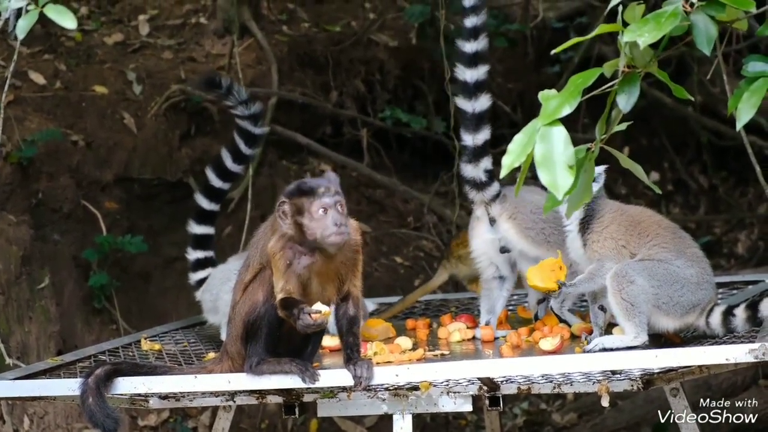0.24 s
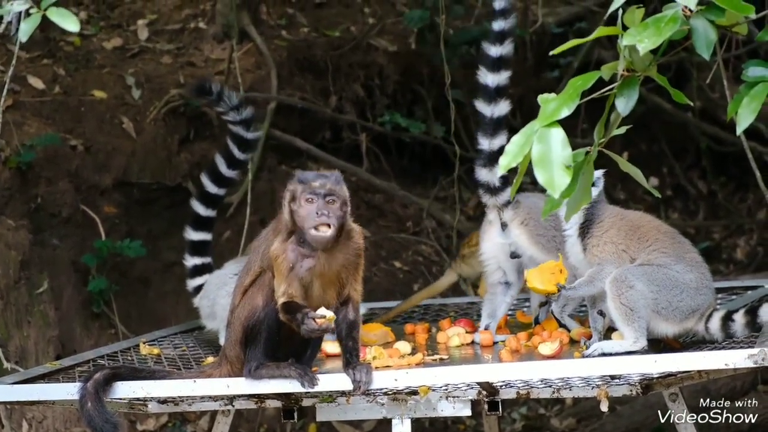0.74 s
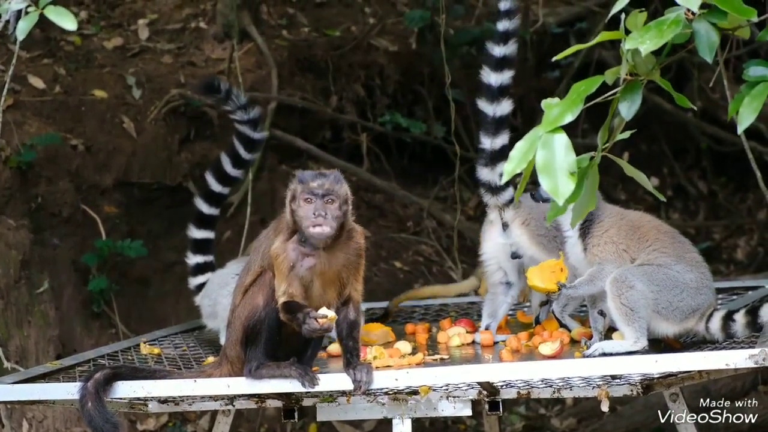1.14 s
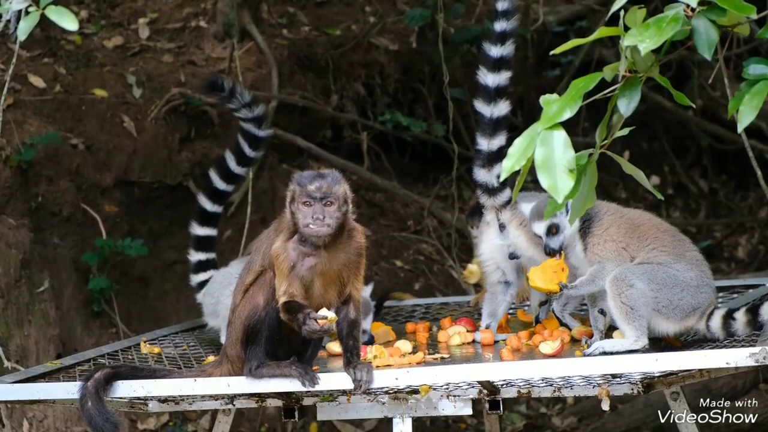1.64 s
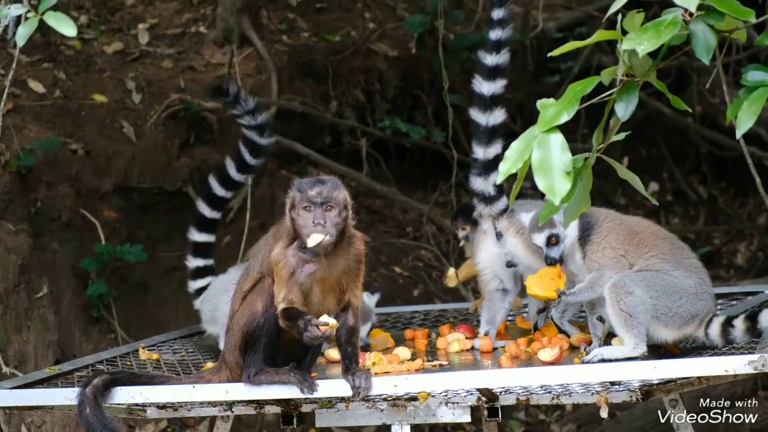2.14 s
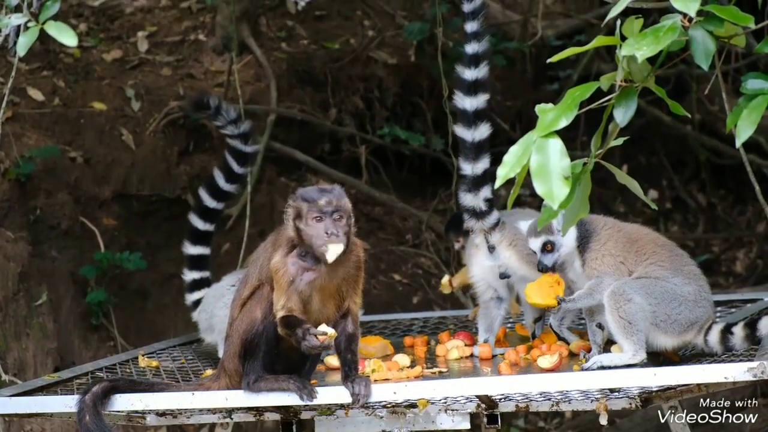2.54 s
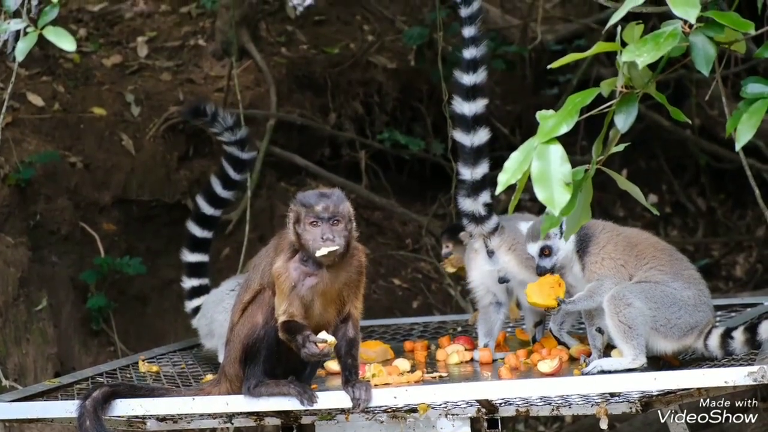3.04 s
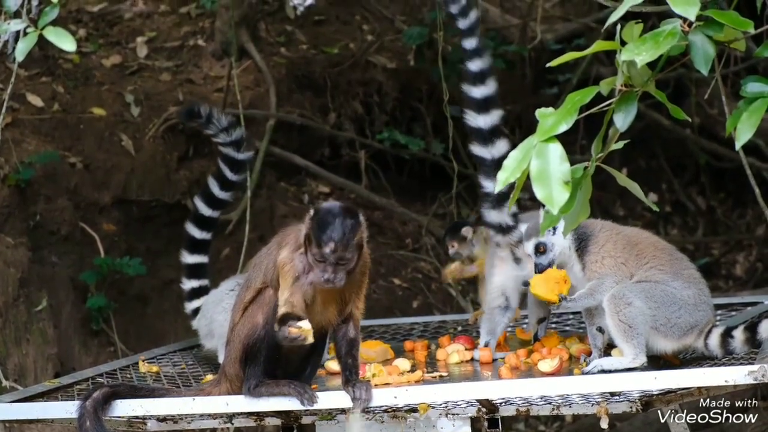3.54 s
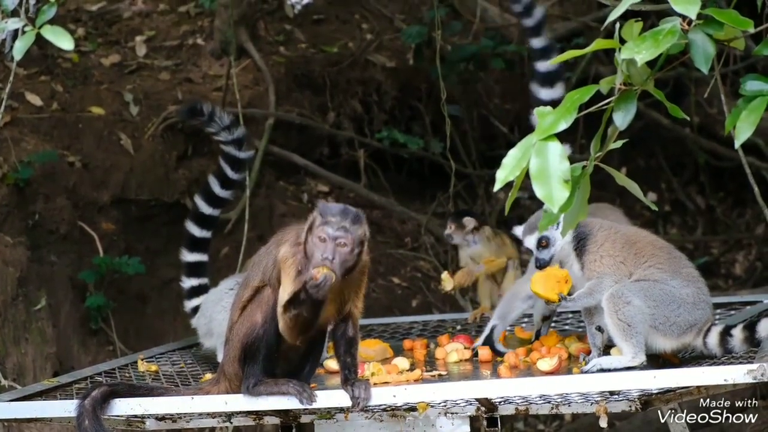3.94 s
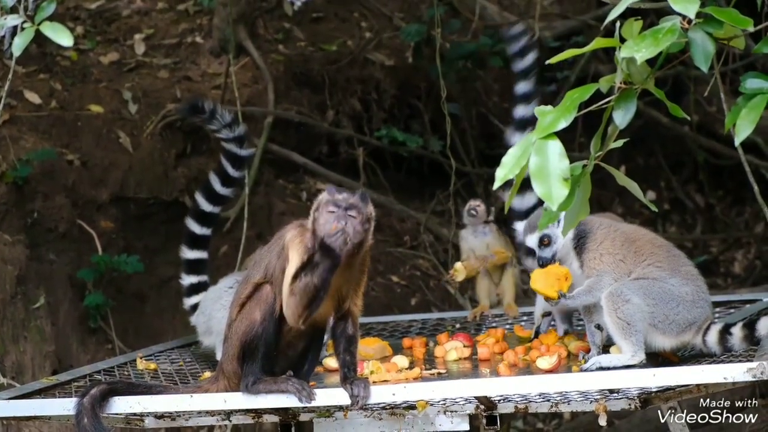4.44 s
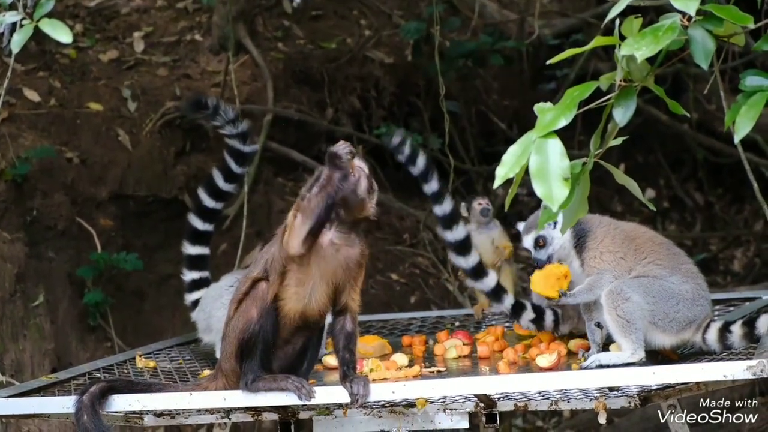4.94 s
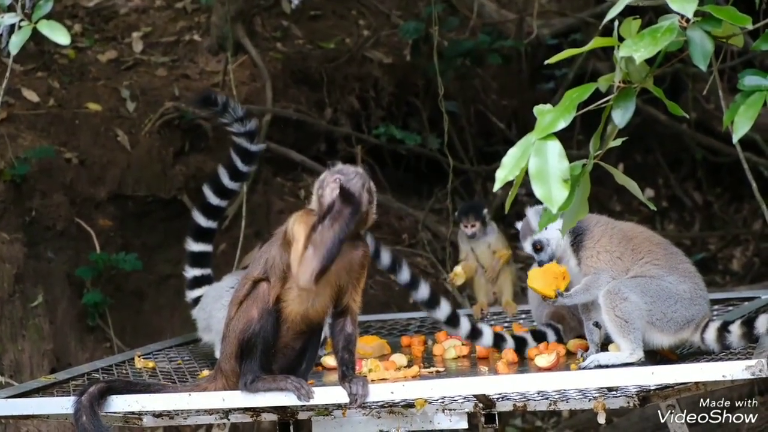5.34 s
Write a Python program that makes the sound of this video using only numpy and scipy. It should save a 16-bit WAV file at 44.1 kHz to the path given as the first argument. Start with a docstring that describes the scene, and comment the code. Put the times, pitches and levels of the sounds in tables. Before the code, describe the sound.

Outdoors at a fruit platform, a low engine drone with clatter and rumble swells up. A breathy whimper leads into a rising growl, then come three spaced yaps, a short hiss and a hoarse bark. The engine drops quieter and slows; a thud, scrapes and metallic taps on wire mesh follow. Voices are close and slightly right, with a short natural echo; thin grainy high noise flickers on the left.

```python
"""An engine hums and clatters first, with a rumble and a fading whine; later it slows down.
Over it monkeys and lemurs squabble for fruit on an outdoor feeding platform: one animal growls, yaps three
times, hisses and gives a hoarse bark; thin, grainy high noise bands sound on the left; feet scuffle on wire mesh.
The engine sums multiples of its firing rate, ringing panels and noise; voices are vocal-fold pulses and breath
through resonances; hisses and high bands are gliding noise; contacts excite mesh, wires and platform."""
import sys
import numpy as np
from scipy import signal
from scipy.fft import rfft, irfft, next_fast_len
from scipy.io import wavfile
from scipy.ndimage import uniform_filter1d, minimum_filter1d

SR = 44100
rng = np.random.default_rng(int(sys.argv[2]) if len(sys.argv) > 2 else 0)


def int16_out(signal):
    """Quantize to a 16-bit WAV file."""
    q = np.round(np.clip(np.atleast_2d(signal).T, -1, 1) * 32767)
    wavfile.write(sys.argv[1], SR, q.astype(np.int16))


N = 245637
TIME = np.arange(N) / SR

# Engine speed: (time [s], firing rate [1/s])
FIRING_RATE = [(0, 26.85), (0.6, 27.28), (1.2, 27.6), (1.8, 27.68), (2.4, 27.44), (3, 27.1), (3.3, 26.79),
               (3.55, 24.61), (3.9, 23.66), (4.5, 23.3), (4.9, 22.6), (5.25, 21.55), (5.57, 20.41)]
# Exhaust drone, before its trim: (time [s], level [dB])
DRONE_LEVEL = [(0.0, -58), (0.04, -37.5), (0.51, -24.5), (2.02, -24), (2.17, -27.5), (2.2, -36),
               (3.35, -36), (3.38, -42), (3.94, -37), (4.19, -44), (4.92, -18), (5.34, -19.5), (5.45, -27),
               (5.57, -42)]
# Exhaust orders: (multiple of the firing rate [1], level [dB])
EXHAUST_ORDERS = [(5, 10), (6, -2), (7, 3)]
# Response of the exhaust pipe: (frequency [Hz], gain [dB])
PIPE_RESPONSE = [(95, -34.5), (118, -1), (140, 0.5), (166, 4.5), (178, -3), (195, -29)]
# Shaking of the engine block, before surge and trim: (time [s], level [dB])
SHAKE_LEVEL = [(0, -54), (.3, -39), (.7, -34), (1, -31), (1.7, -27.5), (2.08, -33), (2.25, -52.5),
               (3.3, -49), (3.5, -53.5), (4.3, -54.5), (4.9, -48), (5.57, -45.5)]
# Orders of the shaking: (multiple of the firing rate [1], level [dB])
BLOCK_ORDERS = [(2, -15), (3, -7), (4, 0), (6, -2), (8, -10), (9, -11), (10, -10)]
# Casing panels: (frequency [Hz], width [Hz], relative level [dB])
CASING_PANELS = [(225.2, 39, 1), (248.1, 12, 2.5), (284, 18, 0), (385.6, 22, -9), (464, 21, -8),
                 (575, 29, -6), (776.4, 44, -13)]
# Whirr of the moving parts: (multiple of the firing rate [1], level re drone [dB])
WHIRR_ORDERS = [(12, -23.5), (14, -25), (17, -18.5), (21, -20.5), (35, -26)]
# A panel through which the whirr passes: (frequency [Hz], gain [dB])
WHIRR_PANEL = [(285, -7), (302, 18.5), (320, 0.5)]
# Clatter and outdoor air, before the trim; also drives the casing: (time [s], level [dB])
AIR_LEVEL = [(0.0, -39.5), (0.17, -30.5), (0.46, -31.5), (0.62, -25.5), (1.09, -28.5), (1.63, -28),
             (2.37, -29.5), (2.54, -40.5), (3.09, -38.5), (3.37, -37.5), (3.54, -43.5), (4.0, -47.5),
             (4.34, -38), (4.82, -27), (5.48, -28.5), (5.57, -49)]
# Spectrum of clatter and outdoor air: (frequency [Hz], relative level [dB])
AIR_SPECTRUM = [(160, -17.5), (280, -2), (303, -10), (461, -6.5), (516, -8.5), (565, -9.5), (662, -9),
                (1880, -12.5), (2700, -29.5), (3750, -20.5), (4200, -41), (5460, -79), (9240, -120)]
# Low rumble: (time [s], level [dB])
RUMBLE_LEVEL = [(0.0, -45), (0.25, -32.5), (.6, -28.5), (0.98, -28.5), (2.08, -32.5), (2.23, -45.5),
                (3.29, -40.5), (3.46, -48), (4.2, -48.5), (4.6, -31), (5.0, -32.5), (5.41, -32),
                (5.57, -23)]
# Spectrum of the rumble: (frequency [Hz], relative level [dB])
RUMBLE_SPECTRUM = [(15, -20), (30, -9), (55, -8), (85, 3), (130, 5), (190, 3), (300, -20), (600, -80)]
# Correlation of the two channels in diffuse noise: (frequency [Hz], correlation [-1 to 1])
CHANNEL_CORRELATION = [(100, 1), (400, 0.82), (850, 0.7), (1500, -0.5), (2500, 0.047)]
# A faint whine that fades away: (time [s], level [dB])
WHINE_LEVEL = [(0, -42), (.25, -45), (.45, -41), (.9, -39.5), (1.15, -46), (2.1, -54), (2.4, -80.5)]
# Its partials: (harmonic number [1], level at time 0 [dB], fade [dB/s])
WHINE_HARMONICS = [(1, -3.5, -1.5), (2, 3.5, 0), (4, -1, 11.5)]
# Steps and scrapes on the mesh: (peak time [s], length scale [s], level [dB], ring of the wire [Hz])
MESH_SCUFFS = [(2.108, 0.035, -21.5, 1700), (2.129, 0.0097, -39, 2550), (4.725, 0.034, -24, 1350),
               (4.74, 0.045, -30, 2700), (4.756, 0.042, -28, 1580), (4.836, .012, -30, 1210),
               (4.893, 0.032, -25.5, 1490), (5.178, 0.046, -32, 2420), (5.209, 0.027, -38.5, 2250),
               (5.235, 0.028, -28.5, 2210), (5.297, 0.037, -23.5, 1590), (5.317, 0.029, -29.5, 2830),
               (5.385, 0.043, -28.5, 1490), (5.519, 0.029, -18.5, 1650), (5.524, 0.016, -19, 600),
               (5.545, 0.042, -20, 2100)]
# Spectrum of the grit under the feet: (frequency [Hz], relative level [dB])
GRIT_SPECTRUM = [(150, -50), (300, 1.5), (570, 5), (1000, -2), (1500, -1.5), (2400, -9), (3200, -16.5),
                 (4500, -8.5), (5200, -65), (7000, -77)]
# Landings on the platform: (time [s], level [dB])
LANDING_HITS = [(4.767, -13), (4.78, -9.5), (5.521, -41)]
# Modes of the platform: (frequency [Hz], relative level [dB], time to fall 60 dB [s])
PLATFORM_MODES = [(199, 5.5, 0.16), (204, -25, .1), (556, -29, 0.041)]
# Claws and scraps of food knock on the mesh: (time [s], level [dB], ring of the wire [Hz])
MESH_TAPS = [(4.711, -15, 1350), (4.785, -26.5, 1110), (4.878, -26, 1620), (4.892, -25.5, 1457),
             (5.063, -24, 1410), (5.171, -27, 2310), (5.289, -18, 1400), (5.362, -18.5, 1625),
             (5.437, -28, 1290), (5.506, -18, 1670), (5.536, -11.5, 1630)]
# Modes of a wire: (multiple of its ring [1], width [Hz], relative level [dB])
WIRE_MODES = [(1, 93, 4), (1.45, 530, -8.5), (.6, 180, -5.5)]
# Thin, grainy high noise bands: (peak time [s], length [s], centre at the peak [Hz], level [dB], glide [Hz/s])
HIGH_BANDS = [(0.654, 0.054, 5090, -43, -3000), (0.69, 0.096, 3900, -34.5, 4),
              (0.757, 0.027, 13500, -44.5, -12), (1.681, 0.055, 14300, -44, -14000),
              (1.762, 0.15, 13500, -47.5, -14000), (1.83, 0.13, 13600, -51, 14009),
              (1.911, 0.055, 14450, -36.5, 5997.5), (2.059, 0.026, 10700, -54, 0),
              (2.104, 0.048, 13840, -27.5, -30000), (2.104, 0.03, 10540, -34, 2),
              (2.105, 0.029, 5030, -32.5, 7), (2.119, 0.043, 4650, -44, 3), (2.13, 0.025, 12400, -42, 0),
              (3.031, 0.068, 12960, -50, 0), (3.185, 0.075, 14100, -44, 0), (3.284, 0.12, 13800, -36, -3),
              (3.285, 0.12, 11440, -43, -15000), (3.536, 0.046, 13700, -55, -1),
              (4.258, .07, 13800, -58, 0), (4.698, .025, 14000, -42, -4), (5.08, 0.078, 13500, -39, -12000),
              (5.119, 0.1, 14200, -30, -4000), (5.168, 0.15, 13200, -38, -10000),
              (5.244, 0.1, 11430, -36.5, -4), (5.272, 0.061, 12300, -34.5, 0),
              (5.269, 0.058, 14300, -33.5, 1), (5.404, 0.028, 12430, -42, 6), (5.512, 0.052, 12200, -29, 6),
              (5.513, 0.058, 13900, -30, 25000)]
# A falling whimper, breathy yips, a short tick on the mesh, hisses and a faint moan: (peak time [s], length
# [s], centre at # the peak [Hz], width [Hz], level [dB], glide [Hz/s])
NEAR_NOISE_BANDS = [(.3, 0.2, 1277, 380, -29.5, -1900), (3.125, 0.054, 1576, 180, -41, 1),
                    (3.188, 0.038, 1590, 600, -34.5, 2.5), (3.277, 0.049, 1593, 260, -26.5, 1),
                    (3.275, 0.051, 2367, 500, -25.5, -1), (3.28, 0.1, 3400, 706, -43, -2),
                    (4.08, 0.066, 1343, 400, -44.5, 0), (4.14, 0.056, 1455, 400, -43.5, 0),
                    (4.74, 0.27, 822, 188, -30.5, -2)]
# Throat resonances: (frequency [Hz], width [Hz], relative level [dB]);
# the first row is the chest, the second the main resonance, the rest the mouth
GROWL_RESONANCES = [(298, 180, 0), (759, 103, 0), (1692, 160, 7), (2410, 500, -8)]
YAP_RESONANCES = [(335, 320, 0), (822, 232, 0), (1660, 240, -2), (2160, 330, -7), (3014, 220, -2.5)]
BARK_RESONANCES = [(535, 120, 0), (915, 206, 0), (1350, 520, 14), (1900, 340, -1), (2200, 380, -2)]
# Growl in surges, before envelope and mouth trim:
# (time [s], level [dB], chest re level [dB], mouth re level [dB])
GROWL_SURGES = [(0.42, -29.5, -1, -9), (0.574, -27, 0.5, -14), (0.583, -18, -7, -16), (0.602, -23, -2, -16),
                (0.62, -18.5, -2, -19), (0.636, -25, 6, -14), (0.648, -16, -3, -1), (0.662, -19, 0, -3),
                (0.676, -13, -4, -10), (0.686, -18, 4, 1), (0.696, -12, -1, -1), (0.704, -18, 0, -8)]
# Pitch of the bark, which sags and then flips up: (time [s], pitch [Hz])
BARK_PITCH = [(3.34, 455), (3.36, 445), (3.383, 420), (3.405, 470), (3.42, 485), (3.428, 535)]
# Effort of the bark, before the rattle: (time [s], level [dB], mouth re level [dB], chest re level [dB])
BARK_STRENGTH = [(3.333, -41.5, 5, -23.5), (3.349, -23.5, 0, -23), (3.361, -20.5, -1, -24),
                 (3.369, -14.5, 0, -35), (3.416, -12.5, -2.5, -35.5), (3.426, -36, 17.5, -2),
                 (3.438, -39, 16.5, 8), (3.448, -38.5, 9.5, 5), (3.47, -40.5, 6, 6)]
# Yaps: (time of highest pitch [s], highest pitch [Hz], rise [s], fall [s], extra chest on top [dB],
# added roughness on the rise [0-1], added roughness on the fall [0-1])
YAP_ARCHES = [(2.242, 549, .066, .068, 2, .07, .07), (2.459, 452, .042, .046, 8, .12, .26),
              (2.821, 506, .051, .051, 18, .09, .06)]
# Effort, one list for each yap: (time [s], level [dB], mouth re level [dB])
YAP_STRENGTHS = [
    [(2.165, -43.5, -4), (2.175, -15.5, -4), (2.19, -13.5, -1.5), (2.202, -7.5, -11.5), (2.222, -15, 6.5),
     (2.244, -23.5, 10), (2.274, -3.5, -12), (2.303, -23, -14.5), (2.325, -34.5, -21)],
    [(2.412, -49, 5.5), (2.426, -21, -0.5), (2.442, -8.5, -3.5), (2.456, -8, -7.5), (2.466, -17, -11),
     (2.492, -14.5, -6.5), (2.515, -25, -15.5), (2.55, -36, -19)],
    [(2.75, -40.5, -7.5), (2.77, -28, -1), (2.783, -12, -2.5), (2.794, -15, 0), (2.802, -17, 0.5),
     (2.821, -25, 4.5), (2.836, -18.5, 2.5), (2.862, -21.5, -18.5), (2.88, -37, -26)],
]
# Chest in a yap, before the extra on top: (pitch [Hz], chest re level [dB])
YAP_CHEST_BY_PITCH = [(270, 1), (370, -10), (430, -19), (550, -10)]
# The voice clears as it rises: (pitch [Hz], roughness before the added part [0-1])
YAP_ROUGHNESS_BY_PITCH = [(290, .6), (370, .38), (420, .16), (480, .04)]

UNEVEN_FIRING = .08  # relative spread of the firing strength
WOBBLE_DB, WOBBLE_HZ = .6, 3.0  # spread and speed of the wobble of each engine order
SURGE_HZ, SURGE_DB, SURGE_PEAK_S = 4.3, 4, 1.3  # the shaking swells and sinks regularly
SECOND_HUM_HZ, SECOND_HUM_DB = 86.6, -2.5  # a steady pitch beside the block; level re the shaking
LABOUR_DB = 1.5  # gain of the casing for each firing per s below the highest speed
AIR_BRIGHT_DB, AIR_TOP_HZ = -27, 3200  # fully bright from this air level up; top of the clatter
WHINE_HZ, WHINE_WAVER = 489.6, .024  # mean pitch and its relative spread
SCUFF_RISE, SCUFF_FALL = 0.38, 0.33  # time constants as shares of a scuff's length scale
GRAINS_HZ, GRAIN_DB = 110, 4.8  # speed and depth of the crackle of the grit
TAP_DECAY_S = .005  # decay time constant of the chatter of contact
HIGH_BAND_WIDTH, HIGH_BAND_GRAIN_DB = 0.035, 4.0  # width as a share of the centre; depth of the grains
BAND_GRAINS_HZ = 70
GROWL_HZ, GROWL_ROUGH = (218, 394.3), (0.93, 0.27)  # each without strain and at full strain
GROWL_MOUTH_DB = -4
GROWL_START_S, GROWL_CLIMAX_S, GROWL_SWELL_S = .36, .699, .11
GROWL_ATTACK_S, GROWL_RELEASE_S = 0.082, 0.008
BARK_ROUGH = .45
BARK_PULSES_PER_S, BARK_PULSE_DB, BARK_PULSE_PEAK_S = 68, 2.0, 3.371  # rate, depth, time of one crest
YAP_FOOT_HZ, YAP_TOP_S = 266, 0.072  # pitch at both ends of the arch; length of its top
CUTOFF_HZ = 15100


def from_db(db):
    """Logarithmic level: decibels become an amplitude gain."""
    return 10 ** (np.asarray(db) / 20)


def rms_one(x):
    """Normalisation: scale the mean power to 1."""
    return x / np.sqrt(np.mean(x ** 2) + 1e-20)


def in_time(rows, t=TIME):
    """Linear interpolation: the columns of a curve at the times t."""
    s, *columns = np.transpose(rows)
    return [np.interp(t, s, c) for c in columns]


def at_hz(points, hz):
    """Logarithmic frequency scale: read a spectrum between its points."""
    f, value = np.transpose(points)
    return np.interp(np.log(hz + 1), np.log(f), value)


def cut(x, hz, kind, order=4):
    """Butterworth filtering: a low- or high-pass with a flat pass band."""
    return signal.sosfilt(signal.butter(order, hz, kind, fs=SR, output="sos"), x)


def wander(hz, size):
    """Low-pass random process: slow chance up to about hz, drawn from a longer curve of spread 1."""
    step, count = 16, 16384  # samples between points; number of points
    f = np.arange(count // 2 + 1) * SR / (step * count)
    spectrum = rfft(rng.standard_normal(count)) * np.exp(-.5 * (f / hz) ** 2)
    slow = rms_one(irfft(spectrum))
    return np.interp(np.arange(size) / step, np.arange(count), slow)


def grains(hz, depth_db):
    """Random amplitude modulation: a gain that breaks noise into grains."""
    return from_db(depth_db * np.clip(wander(hz, N), -2, 2))


def resonate(x, hz, width):
    """Resonance: a damped two-pole oscillator with gain near 1 at its peak."""
    r = np.exp(-np.pi * width / SR)
    numerator = np.array([1, 0, -1]) * (1 - r * r) / 2
    denominator = [1, -2 * r * np.cos(2 * np.pi * hz / SR), r * r]
    return signal.lfilter(numerator, denominator, x + 1e-18)


def body(x, modes):
    """Modal superposition: parallel resonances, each applied twice for dark valleys."""
    return sum(from_db(db) * resonate(resonate(x, hz, width), hz, width) for hz, width, db in modes)


def even(x, seconds):
    """Gain control: hold the running rms at 1."""
    power = uniform_filter1d(x * x, max(int(seconds * SR), 2))
    return x / np.sqrt(np.abs(power) + 1e-14)


def pan(left_db):
    """Interchannel level difference: gains that set left against right."""
    return from_db(np.array([[.5], [-.5]]) * left_db)


def diffuse(colour):
    """Diffuse field: coloured stereo noise whose channel correlation depends on frequency; rms 1."""
    size = 2 * next_fast_len(N // 2 + 1, True)
    f = np.arange(size // 2 + 1) * SR / size
    alike = np.clip(at_hz(CHANNEL_CORRELATION, f), -1, 1)
    mid, side = rfft(rng.standard_normal((2, size))) * from_db(at_hz(colour, f))
    stereo = np.sqrt(1 + alike) * mid + np.sqrt(1 - alike) * side * [[1], [-1]]
    return rms_one(irfft(stereo)[:, :N])


def swell(t, peak_s, length):
    """Half-cosine window: a smooth rise and fall of height 1."""
    return np.cos(np.pi * np.clip((t - peak_s) / length, -.5, .5))


def rumble():
    """Broadband low-frequency radiation: diffuse bass noise under a slow level curve."""
    return from_db(in_time(RUMBLE_LEVEL)[0]) * diffuse(RUMBLE_SPECTRUM)


def engine_order(multiple, db, turns):
    """Harmonic excitation: one slightly wobbling multiple of the firing rate."""
    return from_db(db + WOBBLE_DB * wander(WOBBLE_HZ, N)) * np.sin(2 * np.pi * multiple * turns)


def exhaust(rate, turns, trim_db):
    """Pipe resonance: the pipe weights the exhaust orders as they glide with the engine speed."""
    orders = sum(engine_order(k, db + at_hz(PIPE_RESPONSE, k * rate), turns) for k, db in EXHAUST_ORDERS)
    return from_db(in_time(DRONE_LEVEL)[0] + trim_db) * even(orders, 0.085)


def moving_parts(rate, turns):
    """Forced vibration: high orders whirr and swell when they pass through a panel resonance."""
    orders = sum(engine_order(k, db + at_hz(WHIRR_PANEL, k * rate), turns) for k, db in WHIRR_ORDERS)
    return from_db(in_time(DRONE_LEVEL)[0]) * orders


def block(turns, trim_db):
    """Periodic shaking and beats: surging block orders beside a second low hum of fixed pitch."""
    surge_db = SURGE_DB * np.cos(2 * np.pi * SURGE_HZ * (TIME - SURGE_PEAK_S))
    level = from_db(in_time(SHAKE_LEVEL)[0] + surge_db)
    # odd orders are inverted
    orders = rms_one(sum(engine_order(k, db, turns) * (-1) ** k for k, db in BLOCK_ORDERS))
    second_hum = from_db(SECOND_HUM_DB) * np.sqrt(2) * np.sin(2 * np.pi * SECOND_HUM_HZ * TIME)
    return level * (from_db(trim_db) * orders + second_hum)


def casing(rate, turns, trim_db):
    """Impulse excitation: each uneven firing rings the panels, with added gain as the engine slows."""
    firings = np.diff(np.floor(turns), prepend=0) * (1 + UNEVEN_FIRING * rng.standard_normal(N))
    ringing = rms_one(cut(body(firings, CASING_PANELS), 1600, "low"))
    labour_db = LABOUR_DB * (rate.max() - rate)
    return from_db(in_time(AIR_LEVEL)[0] + labour_db + trim_db) * ringing


def clatter_and_air(turns, trim_db, throb):
    """Amplitude modulation: noise throbs at the firing rate and flickers; it is duller when quieter."""
    level = from_db(in_time(AIR_LEVEL)[0])
    wash = cut(diffuse(AIR_SPECTRUM), AIR_TOP_HZ, "low", order=16)
    brightness = np.clip(level / from_db(AIR_BRIGHT_DB), 0, 1) ** 0.81
    dark = rms_one(cut(wash, 2303, "low", order=12))
    wash = dark + brightness * cut(wash, 2290, "high", order=12)
    throbbing = 1 + throb * np.cos(2 * np.pi * turns)
    flicker = from_db(1.0 * wander(36, N))
    return level * from_db(trim_db) * wash * throbbing * flicker


def engine():
    """Superposition: exhaust, block, casing and moving parts share one firing phase with the clatter."""
    rate, = in_time(FIRING_RATE)
    turns = np.cumsum(rate) / SR  # firings so far
    tones = exhaust(rate, turns, trim_db=0.5) + block(turns, trim_db=2.0)
    tones = tones + casing(rate, turns, trim_db=-9.5) + moving_parts(rate, turns)
    clatter = clatter_and_air(turns, trim_db=-2.5, throb=0.09)
    return (tones + rumble()) * pan(-2.5) + clatter * pan(-4.0)


def whine():
    """Harmonic series with frequency modulation: a faint unsteady tone whose highest partial dies first."""
    db, = in_time(WHINE_LEVEL)
    phase = 2 * np.pi * np.cumsum(WHINE_HZ * (1 + WHINE_WAVER * wander(35, N))) / SR
    tone = sum(from_db(db + part_db - fade * TIME) * np.sin(k * phase) for k, part_db, fade in WHINE_HARMONICS)
    return np.sqrt(2) * tone * pan(-7.5)


def scuffs(ring_db, ring_width_hz):
    """Friction excitation: clumped grains of grit rub the mesh and set its wires ringing."""
    grit = diffuse(GRIT_SPECTRUM) * grains(GRAINS_HZ, GRAIN_DB)
    out = np.zeros((2, N))
    for s, length, db, hz in MESH_SCUFFS:
        span = np.abs(TIME - s) < 2 * length
        age = (TIME[span] - s) / length
        ring = rms_one(resonate(grit[:, span], hz, ring_width_hz))
        rub = rms_one(rms_one(grit[:, span]) + from_db(ring_db) * ring)
        stroke = 2 / (np.exp(-age / SCUFF_RISE) + np.exp(age / SCUFF_FALL))
        out[:, span] += from_db(db) * stroke * rub
    return cut(out, 4250, "low", order=12) * pan(-3.5)


def landings():
    """Free vibration: each landing leaves the platform modes to decay as a thud."""
    out = np.zeros(N)
    for s, db in LANDING_HITS:
        age = np.maximum(TIME - s, 0)
        for hz, mode_db, t60 in PLATFORM_MODES:
            out += from_db(db + mode_db - 60 * age / t60) * np.sin(2 * np.pi * hz * age)
    return cut(cut(out, 430, "low"), 110, "high", order=2) * pan(-3.5)


def taps():
    """Impact excitation: a brief chatter of contact leaves a wire ringing in its modes."""
    out, t = np.zeros(N + SR), TIME[:SR // 10]
    for s, db, hz in MESH_TAPS:
        contact = rng.standard_normal(len(t)) * np.exp(-t / TAP_DECAY_S)
        ring = sum(from_db(mode_db) * resonate(contact, ratio * hz, width) for ratio, width, mode_db in WIRE_MODES)
        start = int(s * SR)
        out[start:start + len(t)] += from_db(db) * ring / np.abs(ring).max()
    return cut(out[:N], 2500, "low", order=8) * pan(-1.0)


def gliding_bands(rows, grain_db=0):
    """Narrow-band noise: two slow noises modulate a gliding carrier, which may break into grains."""
    out = np.zeros(N)
    breaks = grains(BAND_GRAINS_HZ, grain_db)
    for peak_s, length, hz, width, db, glide in rows:
        span = np.abs(TIME - peak_s) < length / 2
        t = TIME[span]
        # the two noises ride on carriers a quarter cycle apart
        a, b = cut(rng.standard_normal((2, N // 8)), width / 2, "low", order=3)[:, -len(t):]
        phase = 2 * np.pi * np.cumsum(hz + glide * (t - peak_s)) / SR
        band = rms_one(breaks[span] * (a * np.cos(phase) + b * np.sin(phase)))
        out[span] += from_db(db) * swell(t, peak_s, length) ** 1.3 * band
    return out


def high_bands():
    """Narrow-band noise: thin, grainy high bands, much stronger on the left."""
    rows = [(s, length, hz, HIGH_BAND_WIDTH * hz, db, glide) for s, length, hz, db, glide in HIGH_BANDS]
    return gliding_bands(rows, HIGH_BAND_GRAIN_DB) * from_db([[0], [-15]])


def call(rows, throat, jitter, breath, flutter_db, flutter_hz):
    """Source and filter: fold pulses, uneven and breathy with roughness, ring in chest, throat and mouth."""
    # rows: (time [s], pitch [Hz], level [dB], chest re level [dB], mouth re level [dB], roughness [0-1])
    span = (TIME > rows[0][0]) & (TIME < rows[-1][0])
    t, out = TIME[span], np.zeros(N)
    pitch, level_db, chest_db, mouth_db, rough = in_time(rows, t)
    rough = np.clip(rough, 0, 1)
    phase = 2 * np.pi * np.cumsum(pitch * (1 + jitter * rough * wander(160, len(t)))) / SR
    folds = rms_one(sum(np.cos(k * phase) for k in range(1, 13)))
    # air escapes in a puff on every cycle
    puffs = rms_one(cut(rng.standard_normal(len(t)), 3800, "low") * (1.5 + np.cos(phase)))
    source = (1 - rough) * folds + breath * rough * puffs
    source = source * from_db(flutter_db * rough * wander(flutter_hz, len(t)))
    # a wide-open mouth favours its upper resonances
    opening = from_db(0.77 * np.maximum(mouth_db, 0))
    chest = even(body(source, throat[:1]), 0.012)
    main = even(body(source, throat[1:2]), 0.012)
    mouth = even(body(source, throat[2:3]) + opening * body(source, throat[3:]), 0.012)
    out[span] = from_db(level_db) * (main + from_db(chest_db) * chest + from_db(mouth_db) * mouth)
    return cut(out, 2735, "low", order=16)


def envelope_db(t, start, length, attack, release):
    """Amplitude envelope: attack, hold and release, in dB."""
    gain = np.minimum((t - start) / attack, (start + length - t) / release)
    return 20 * np.log10(np.clip(gain, 1e-3, 1))


def growl():
    """Vocal-fold tension: in a surging growl, growing strain raises the pitch and clears the voice."""
    t = np.arange(GROWL_START_S, GROWL_CLIMAX_S + GROWL_RELEASE_S, 1 / SR)
    strain = np.exp(np.minimum(t - GROWL_CLIMAX_S, 0) / GROWL_SWELL_S)
    pitch = np.interp(strain ** 3, (0, 1), GROWL_HZ)
    rough = np.interp(strain, (0, 1), GROWL_ROUGH)
    level, chest, mouth = in_time(GROWL_SURGES, t)
    level = level + envelope_db(t, t[0], t[-1] - t[0], GROWL_ATTACK_S, GROWL_RELEASE_S)
    rows = np.transpose([t, pitch, level, chest, mouth + GROWL_MOUTH_DB, rough])
    return call(rows, GROWL_RESONANCES, jitter=0.077, breath=1.0, flutter_db=7.5, flutter_hz=60)


def bark():
    """Register change: a rattling burst shifts its weight to chest and mouth as the pitch flips up."""
    t = np.arange(BARK_STRENGTH[0][0], BARK_STRENGTH[-1][0], 1 / SR)
    pitch, = in_time(BARK_PITCH, t)
    level, mouth, chest = in_time(BARK_STRENGTH, t)
    rattle = BARK_PULSE_DB * np.cos(2 * np.pi * BARK_PULSES_PER_S * (t - BARK_PULSE_PEAK_S))
    rows = np.transpose([t, pitch, level + rattle, chest, mouth, np.full(len(t), BARK_ROUGH)])
    return call(rows, BARK_RESONANCES, jitter=0.084, breath=1.0, flutter_db=4.5, flutter_hz=98)


def yap(arch, effort):
    """Pitch-dependent resonance: an arch, rougher at its feet, whose chest drops out or takes over on top."""
    top_s, top_hz, rise_s, fall_s, top_chest_db, rough_rise, rough_fall = arch
    t = np.arange(effort[0][0], effort[-1][0], 1 / SR)
    level, mouth = in_time(effort, t)
    height = np.maximum(1 - ((t - top_s) / np.where(t < top_s, rise_s, fall_s)) ** 2, 0)
    pitch = YAP_FOOT_HZ + (top_hz - YAP_FOOT_HZ) * height
    chest = at_hz(YAP_CHEST_BY_PITCH, pitch) + top_chest_db * swell(t, top_s, YAP_TOP_S)
    rough = np.where(t < top_s, rough_rise, rough_fall) + at_hz(YAP_ROUGHNESS_BY_PITCH, pitch)
    rows = np.transpose([t, pitch, level, chest, mouth, rough])
    return call(rows, YAP_RESONANCES, jitter=0.13, breath=1.0, flutter_db=7.0, flutter_hz=90)


def from_right(x, lag_ms, left_db):
    """Interchannel delay: sound from the right reaches the left channel later and weaker."""
    return np.array([np.interp(TIME - lag_ms / 1000, TIME, x), x]) * pan(left_db)


def enclosure(x, early_db, early_t60, late_db, late_t60):
    """Reverberation: quick reflections off platform and bank, and a fainter, longer tail from the trees."""
    t = TIME[:SR]
    out = 0
    for db, t60 in ((early_db, early_t60), (late_db, late_t60)):
        echo = rng.standard_normal((2, SR)) * from_db(-60 * t / t60) * (t > .004)
        echo /= np.sqrt(np.sum(echo ** 2, axis=1, keepdims=True))
        out = out + from_db(db) * signal.fftconvolve(x[None], echo, axes=1)[:, :N]
    return out * pan(-0.98)


def scene():
    """Superposition: engine and whine, contacts on the platform, high bands, then the near voices."""
    background = engine() + whine()
    contacts = scuffs(ring_db=5, ring_width_hz=440) + landings() + taps()
    yaps = sum(yap(arch, effort) for arch, effort in zip(YAP_ARCHES, YAP_STRENGTHS))
    voices = gliding_bands(NEAR_NOISE_BANDS) + growl() + bark() + yaps
    near = from_right(voices, lag_ms=0.087, left_db=-2.5)
    echoes = enclosure(voices, early_db=-8.0, early_t60=0.16, late_db=-17.5, late_t60=0.56)
    return background + contacts + high_bands() + near + echoes


def record(dry):
    """Peak limiting and band limiting: fast gain holds the loudest peaks down; the top is cut steeply."""
    ceiling, window = .94, int(.004 * SR)  # amplitude; samples
    gain = minimum_filter1d(ceiling / np.maximum(np.abs(dry).max(axis=0), ceiling), 2 * window)
    gain = uniform_filter1d(uniform_filter1d(gain, window), window)
    low_pass = signal.ellip(10, .1, 80, CUTOFF_HZ, fs=SR, output="sos")
    return signal.sosfilt(low_pass, dry * gain)


dry = scene()
out = record(dry)
int16_out(out)
```